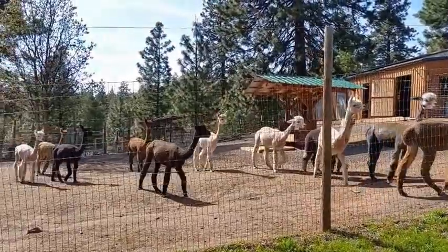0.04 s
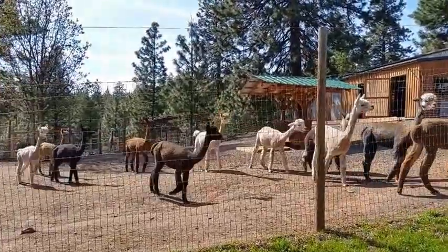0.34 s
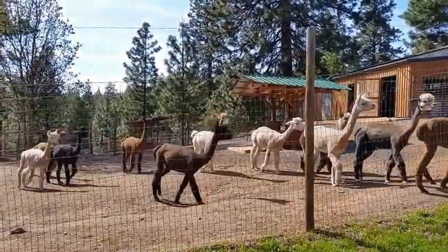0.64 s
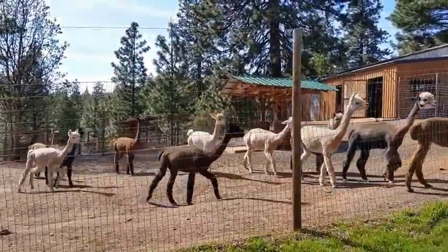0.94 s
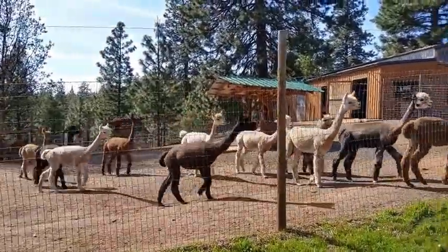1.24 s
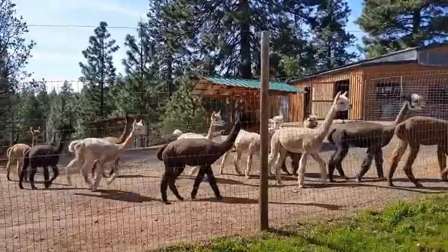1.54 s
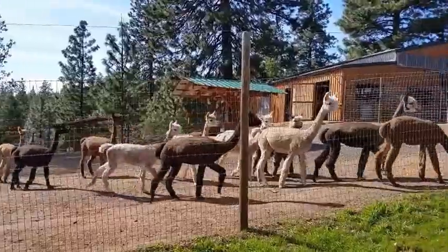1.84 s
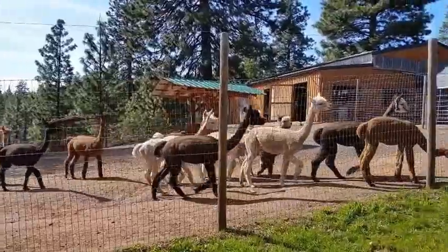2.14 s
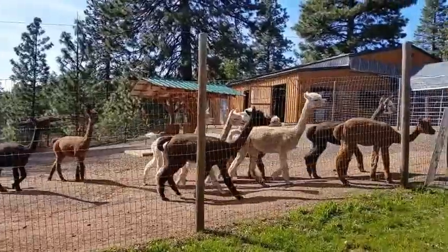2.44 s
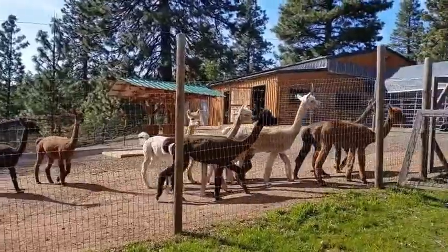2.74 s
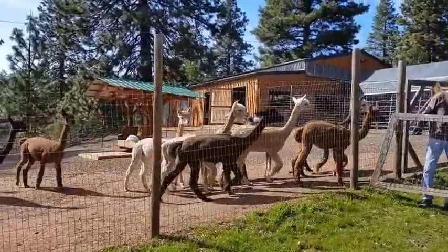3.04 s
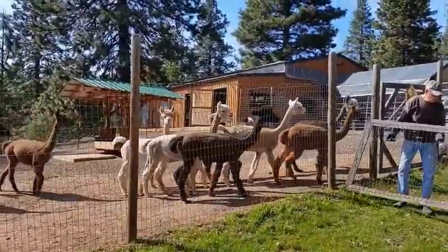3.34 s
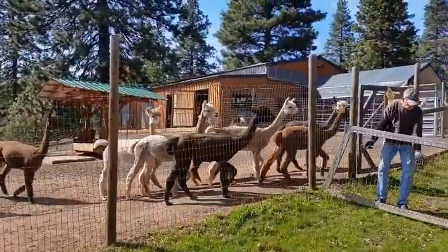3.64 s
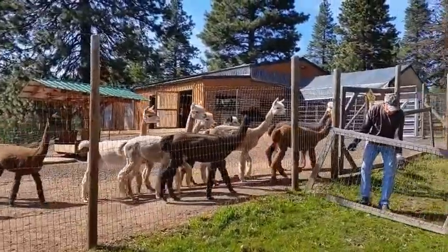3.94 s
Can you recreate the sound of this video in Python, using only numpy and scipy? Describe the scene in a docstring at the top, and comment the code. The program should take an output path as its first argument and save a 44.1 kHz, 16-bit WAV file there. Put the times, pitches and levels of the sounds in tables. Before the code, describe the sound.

Soft footsteps of an alpaca herd crunch and scuff on dry dirt in an outdoor pen, growing louder as the animals come near, with tiny snaps. Light wind rumbles on the microphone throughout.

```python
"""Soft crunching steps over a low rumble: a herd of alpacas walks past on dry dirt, a few metres away.
Padded feet crush and scuff the ground, and the crunching grows as the herd comes near. Stalks and
crusts snap, pebbles clink, one foot drags, and something hard is knocked farther off.
A light wind rumbles on the two microphone ports of a hand-held camera; single eddies bump either port."""
import sys
import numpy as np
from scipy import signal
from scipy.fft import rfft, irfft
from scipy.io import wavfile

SR = 44100
rng = np.random.default_rng(int(sys.argv[2]) if len(sys.argv) > 2 else 0)


def log_audio(samples):
    """Write samples as a 16-bit WAV file to the path given in sys.argv[1]."""
    # one column per channel
    frames = np.atleast_2d(samples).T
    # limit to full scale, then quantise
    limited = np.clip(frames, -1, 1)
    pcm = np.round(limited * 32767).astype(np.int16)
    wavfile.write(sys.argv[1], SR, pcm)


N = 176400
T = np.arange(N) / SR

# Near footfalls. Each row: start in seconds, length in seconds, crunch, scrape and sand levels in dB.
FOOTFALLS = [(0.185, 0.085, -71, -76, -69), (0.218, 0.0071, -59, -73, -72), (0.602, 0.12, -62.5, -82, -85),
             (0.738, 0.034, -64.5, -78, -61.5), (0.825, 0.028, -63, -70, -71),
             (0.876, 0.067, -64.5, -68, -76), (0.958, 0.04, -69, -82, -63.5), (1.001, 0.036, -63, -69, -59),
             (1.096, 0.022, -65, -69, -72), (1.144, 0.018, -72, -67, -69), (1.214, 0.017, -64, -63, -67),
             (1.33, 0.015, -62, -67, -73), (1.403, 0.026, -76, -67, -78), (1.491, 0.042, -71, -70, -59),
             (1.905, 0.14, -66, -70, -84), (1.981, 0.018, -73, -67, -61), (2.035, 0.031, -65, -69, -72),
             (2.158, 0.044, -60, -63.5, -73), (2.249, .033, -61, -65, -66), (2.371, 0.039, -57.5, -61, -72),
             (2.417, 0.032, -74, -67, -62), (2.459, 0.023, -53.5, -64, -72),
             (2.537, 0.028, -57, -54.5, -66), (2.746, 0.022, -63, -61.5, -70),
             (2.778, 0.047, -82, -61.5, -73), (2.974, 0.038, -58, -60.5, -68),
             (3.061, 0.02, -67, -64.5, -67), (3.228, 0.053, -68, -62.5, -70), (3.36, 0.031, -69, -72, -62),
             (3.458, .035, -76, -70, -60), (3.615, 0.026, -65, -63.5, -60), (3.75, 0.069, -72, -67, -56.5),
             (3.948, 0.23, -54, -56, -74)]
# Spectra of dull crunch, gritty scrape, fine sand and a dragged foot.
# Each row: frequency in Hz, relative level in dB.
CRUNCH_SPECTRUM = [(250, -26), (600, 5), (950, -4.5), (1400, 0.5), (1950, 0.5), (2500, -4.5), (3200, -13.5),
                   (6000, -26)]
SCRAPE_SPECTRUM = [(1000, -19), (3400, -7), (4350, -0.5), (5200, -3), (6100, -5.5), (7300, -8.5),
                   (8400, -0.5), (9700, -11), (15500, -10)]
SAND_SPECTRUM = [(3000, -25), (7200, -26), (8600, 0), (10000, -5), (11500, -2), (13500, -1.5), (15800, -2)]
DRAG_SPECTRUM = [(600, -10), (1950, 1.5), (3200, -14), (4450, 2), (5400, -7), (6300, -15), (8200, 1),
                 (9900, -16), (12900, -6.5), (15500, -16)]
# One foot drags harder and harder, then lifts. Each row: time in seconds, level in dB.
DRAG_LEVELS = [(2.54, -67), (2.57, -57), (2.665, -52.5), (2.695, -55), (2.735, -77)]
# The many other feet. Each row: time in seconds, crunch, scrape and sand levels in dB.
HERD_LEVELS = [(0, -69, -79, -80.5), (.3, -67, -74, -73.5), (1.35, -66, -72.5, -73), (2.0, -59, -64.5, -71),
               (2.45, -61.5, -66, -69), (3.4, -63, -66, -68), (4, -60.5, -66, -66.5)]
# Stalks and crusts breaking. Each row: start in seconds, relative level in dB, pitch in Hz.
SNAPS = [(0.041, -47.5, 8500), (.366, -46, 13000), (0.697, -46, 11400), (.807, -44.5, 13000),
         (1.304, -45.5, 4800), (1.303, -44.5, 12000), (1.646, -44, 13000), (2.063, -43, 9100),
         (2.123, -37, 8600), (2.682, -33.5, 4600), (2.938, -39, 8900), (3.123, -48, 5200),
         (3.132, -35, 5600), (3.79, -35, 8600), (3.791, -42, 13000), (3.841, -38.5, 10000)]
# Blows on pebbles and on a farther hard object. Each row: start in seconds, relative level in dB.
PEBBLE_BLOWS = [(1.719, -54), (1.750, -50.5), (1.871, -48), (1.988, -49.5)]
KNOCK_BLOWS = [(0.569, -47), (0.615, -57), (.667, -60)]
# Their modes. Each row: frequency in Hz, relative level in dB, time to fall 60 dB in seconds.
PEBBLE_RESONANCES = [(4660, -10, 0.018), (5080, -8, .016), (10530, 2.5, 0.0065), (14100, -6, .008)]
KNOCK_RESONANCES = [(945, 3, 0.04), (1420, -2, .03), (1855, -2.5, 0.043), (2130, -18, .11)]
# Eddies. Each row: centre time in seconds, level in dB, main frequency in Hz, port (0 left, 1 right).
PORT_EDDIES = [(.172, -13.5, 61.3, 1), (.287, -21, 111, 0), (0.295, -14.5, 81, 1), (.59, -15.5, 128, 1),
               (0.964, -14.5, 126, 0), (1.378, -20, 102, 0), (1.634, -10, 70, 1), (1.668, -17, 124, 1),
               (1.927, -20, 125, 0), (2.617, -16.5, 86, 0), (2.005, -16.5, 113, 0), (2.176, -18.5, 148, 1),
               (2.184, -18, 130, 0), (2.209, -11.5, 62.6, 1), (2.296, -11.5, 136, 1),
               (2.336, -12.5, 54.4, 1), (2.445, -14, 99, 1), (2.756, -12.5, 110, 0), (2.895, -9.5, 84.4, 0),
               (3.023, -10.5, 55, 0), (3.036, -14.5, 98, 1), (3.072, -14, 156, 0), (3.381, -15.5, 123, 0),
               (3.586, -13, 61.4, 0), (3.883, -12, 142, 0), (3.919, -15, 88, 1)]
# Strength of the wind rumble. Each row: time in seconds, level in dB.
RUMBLE_LEVELS = [(0, -28.5), (.95, -29), (1.2, -29.5), (1.5, -36), (1.65, -29.5), (2.2, -26.5),
                 (2.7, -31.5), (3.1, -28), (3.4, -27), (3.76, -31.5), (3.9, -28)]
# Balance of the rumble. Each row: time in seconds, left over right in dB.
RUMBLE_BALANCE = [(.5, 0.5), (1.9, 5.5), (2.3, -2), (2.7, 3), (4, 1.5)]
# Spectrum of the turbulence. Each row: frequency in Hz, relative level in dB.
RUMBLE_SPECTRUM = [(15, -28), (25, -29), (40, -2), (65, 0), (105, 0), (160, -6), (230, -15), (330, -25),
                   (500, -36.5), (750, -43.5), (1200, -55), (3000, -99)]
# How the ports colour ground sounds. Each row: frequency in Hz, left over right in dB.
PORT_BALANCE = [(300, 5.5), (1300, 0), (2400, 1.5), (4400, 6.5), (6000, 8), (8100, -2), (11000, -0.5),
                (15000, 2.5)]

DIRT_SPECTRA = (CRUNCH_SPECTRUM, SCRAPE_SPECTRUM, SAND_SPECTRUM)


def footfalls(attack_share=0.23):
    """Granular compaction: each foot presses and lets go, crushing clods, scraping grit, spraying sand."""
    envelopes = np.zeros((3, N))
    for start, length, *levels_db in FOOTFALLS:
        active = (T > start) & (T < start + 2 * length)
        progress = (T[active] - start) / length
        load = np.minimum(progress / attack_share, 1) * np.exp(-progress ** 4)
        envelopes[:, active] += undb(levels_db)[:, None] * load
    return sum(envelope * grains(spectrum, spread_db=5.5, rate_hz=1100)
               for envelope, spectrum in zip(envelopes, DIRT_SPECTRA))


def dragged_foot():
    """Sliding friction: a foot drawn through grit makes one unbroken, grainy hiss."""
    level_db = np.interp(T, *np.array(DRAG_LEVELS).T, left=-np.inf, right=-np.inf)
    return undb(level_db) * grains(DRAG_SPECTRUM, spread_db=3.5, rate_hz=1500)


def herd():
    """Incoherent addition: the other feet merge into one pattering rustle."""
    times, *levels_db = np.array(HERD_LEVELS).T
    patter_db = 1.22 * fluctuation(25.4)
    return sum(undb(np.interp(T, times, db) + patter_db) * grains(spectrum, spread_db=2, rate_hz=1400)
               for db, spectrum in zip(levels_db, DIRT_SPECTRA))


def grains(spectrum, spread_db, rate_hz, correlation=0.22):
    """Granular noise: crushed dirt gives tiny uneven bursts, partly coherent at the two ports."""
    common = np.sqrt(correlation) * rng.standard_normal(N)
    separate = np.sqrt(1 - correlation) * rng.standard_normal((2, N))
    burst_gain = undb(spread_db * fluctuation(rate_hz))
    return unit(colour((common + separate) * burst_gain, spectrum))


def snaps(ring_s=0.0017, crumble_s=0.0087, crumble_db=-16.5, relative_width=0.16, trim_db=-12):
    """Brittle fracture: dry stalks and crusts snap with a very short, broad ring, then crumble."""
    out, size = np.zeros((2, N)), 1024
    t, f = np.arange(size) / SR, np.fft.rfftfreq(size, 1 / SR)
    fade = np.exp(-t / ring_s) + undb(crumble_db) * np.exp(-t / crumble_s)
    for start, db, hz in SNAPS:
        resonance = 1 / (1 + ((f - hz) / (relative_width * hz)) ** 2)
        noise = rfft(rng.standard_normal((2, size)))
        ring = unit(irfft(noise * (resonance + 0.066)))  # the flat floor is the broadband crack
        i = int(start * SR)
        out[:, i:i + size] += undb(db + trim_db) * ring * fade
    return out


def crumbs(cracks_per_s=220, spread_db=5, decay_s=0.0014, above_sand_db=-5.5):
    """A Poisson process: tiny independent cracks, louder as the herd comes near."""
    times, _, _, sand_db = np.array(HERD_LEVELS).T
    onsets = rng.random(N) < cracks_per_s / SR
    sizes = undb(spread_db * np.minimum(rng.exponential(size=N), 4))
    envelope = signal.lfilter([1], [1, -np.exp(-1 / (decay_s * SR))], onsets * sizes)
    bursts = envelope * rng.standard_normal((2, N))
    crackle = unit(colour(bursts, SAND_SPECTRUM) + colour(bursts, SCRAPE_SPECTRUM))
    return crackle * undb(np.interp(T, times, sand_db) + above_sand_db)


def pebbles():
    """Impact of small stiff bodies: pebbles clink underfoot in high, quickly damped modes."""
    return struck(PEBBLE_BLOWS, PEBBLE_RESONANCES, left_over_right_db=9)


def knocks(yard_db=-4, yard_decay_s=0.07):
    """Reverberation: a hard object is bumped and rattles, and the yard's reflections add a short tail."""
    direct = struck(KNOCK_BLOWS, KNOCK_RESONANCES, left_over_right_db=1)
    yard_response = unit(rng.standard_normal((2, N)) * np.exp(-T / yard_decay_s)) / np.sqrt(N)
    return direct + undb(yard_db) * signal.fftconvolve(direct, yard_response, axes=1)[:, :N]


def struck(blows, modes, left_over_right_db, detune=0.016, contact_s=0.00044):
    """Modal vibration: each blow excites damped sinusoids, tuned a little differently each time."""
    hz, mode_db, t60 = np.array(modes, float).T[:, :, None]
    out = np.zeros(N)
    for start, blow_db in blows:
        active = (T >= start) & (T < start + 0.25)
        t = T[active] - start
        tuned_hz = hz * (1 + detune * rng.standard_normal(hz.shape))
        rings = undb(mode_db - 60 * t / t60) * np.sin(2 * np.pi * tuned_hz * t)
        attack = 1 - np.exp(-t / contact_s)
        out[active] += undb(blow_db) * rings.sum(axis=0) * attack
    return out * undb([[left_over_right_db / 2], [-left_over_right_db / 2]])


def wind_rumble():
    """Flow noise: light wind over the ports rumbles, swelling and leaning from side to side."""
    level_db = np.interp(T, *np.array(RUMBLE_LEVELS).T)
    lean_db = np.interp(T, *np.array(RUMBLE_BALANCE).T) / 2
    return turbulence() * undb(level_db + np.array([lean_db, -lean_db]))


def eddies(falloff=2.73, wake_db=-13, wake_s=0.02):
    """Vortex passage: each eddy gives one port a rounded pressure swing inside a brief turbulent wake."""
    out, swirl = np.zeros((2, N)), turbulence()
    for centre, db, hz, port in PORT_EDDIES:
        active = abs(T - centre) < 0.1
        t = T[active] - centre
        phase = np.exp(2j * np.pi * rng.random())
        swing = phase / (1 - 2j * np.pi * hz * t / (falloff - 1)) ** falloff  # spectrum peaks at hz
        wake = undb(wake_db) * swirl[port, active] * np.exp(-(t / wake_s) ** 2)
        out[port, active] += undb(db) * (swing.real + wake)
    return out


def turbulence(swirl_db=2.5, swirl_hz=43.5, flutter_db=0.07, flutter_hz=1.8):
    """Turbulent pressure is local: its low swirling is uncorrelated between the two ports."""
    gain = np.array([undb(swirl_db * fluctuation(swirl_hz) + flutter_db * fluctuation(flutter_hz))
                     for _ in range(2)])
    return unit(colour(rng.standard_normal((2, N)) * gain, RUMBLE_SPECTRUM))


def fluctuation(rate_hz):
    """Low-pass noise: a smooth random signal of rms 1, varying mostly below rate_hz."""
    f = np.fft.rfftfreq(N, 1 / SR)
    return unit(irfft(rfft(rng.standard_normal(N)) / (1 + (f / rate_hz) ** 2) ** 2, N))


def colour(x, spectrum):
    """Linear filtering: gains in dB are interpolated over log frequency."""
    hz, db = np.array(spectrum, float).T
    f = np.maximum(np.fft.rfftfreq(N, 1 / SR), 1)
    return irfft(rfft(x) * undb(np.interp(np.log(f), np.log(hz), db)), N)


def undb(db):
    """Decibels to amplitude ratio."""
    return 10 ** (np.asarray(db) / 20)


def unit(x):
    """Normalisation to rms 1."""
    return x / np.sqrt(np.mean(x ** 2))


def scene(left_lag_s=0.00043):
    """Superposition: ground sounds reach the right port first, each port colours them, and wind adds."""
    left, right = footfalls() + dragged_foot() + herd() + crumbs() + snaps() + pebbles() + knocks()
    left = np.roll(left, int(left_lag_s * SR))
    left = colour(left, [(hz, db / 2) for hz, db in PORT_BALANCE])
    right = colour(right, [(hz, -db / 2) for hz, db in PORT_BALANCE])
    return np.array([left, right]) + wind_rumble() + eddies()


def record(dry):
    """Band limiting: the camera cuts the treble above 15.7 kHz."""
    return signal.sosfilt(signal.ellip(10, 0.2, 80, 15700, fs=SR, output="sos"), dry)


dry = scene()
out = record(dry)
log_audio(out)
```